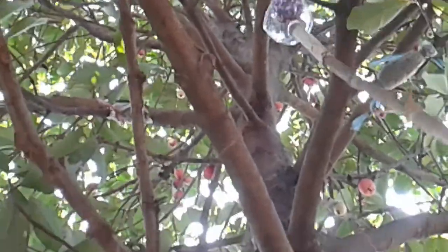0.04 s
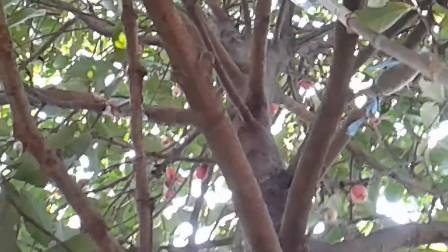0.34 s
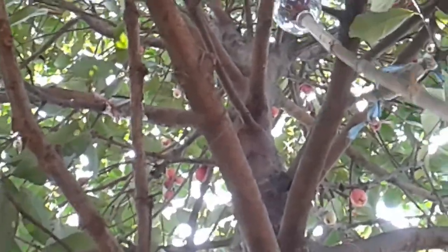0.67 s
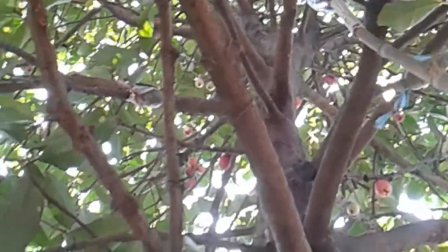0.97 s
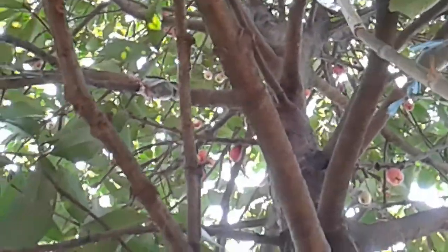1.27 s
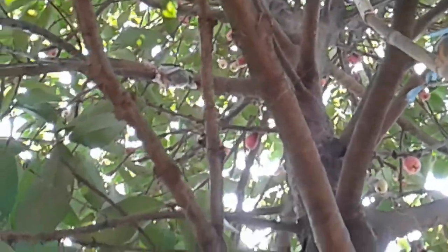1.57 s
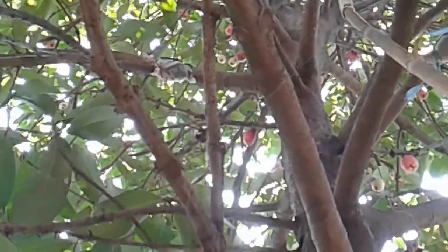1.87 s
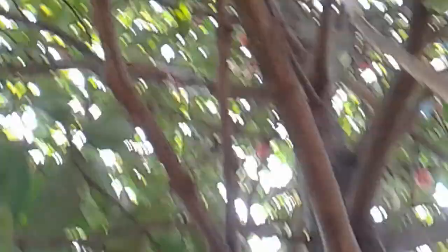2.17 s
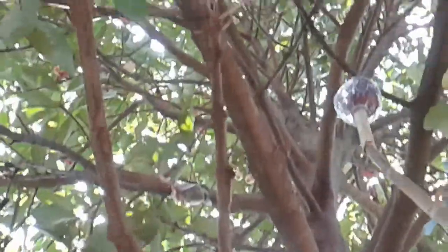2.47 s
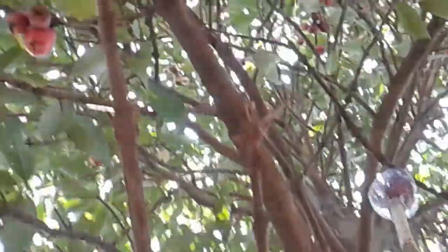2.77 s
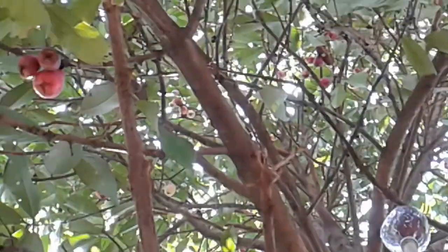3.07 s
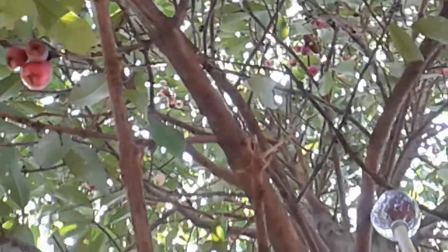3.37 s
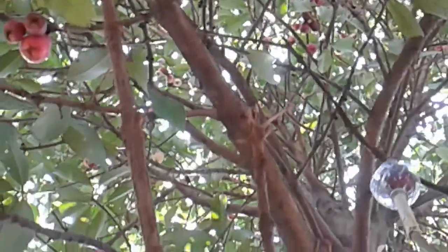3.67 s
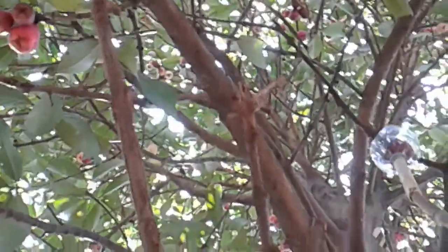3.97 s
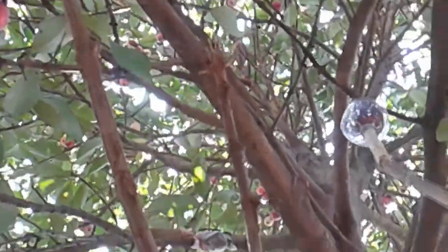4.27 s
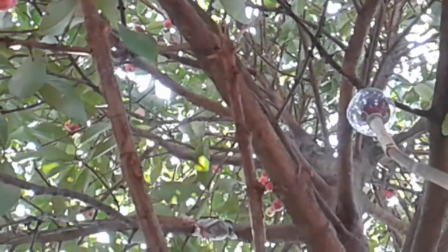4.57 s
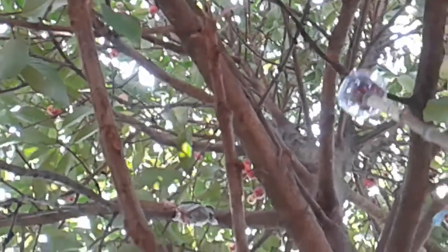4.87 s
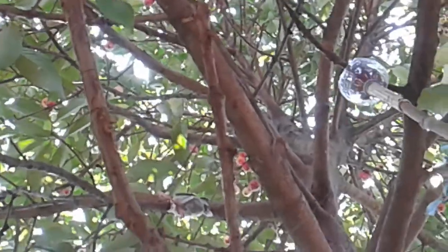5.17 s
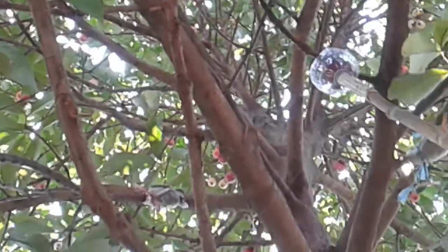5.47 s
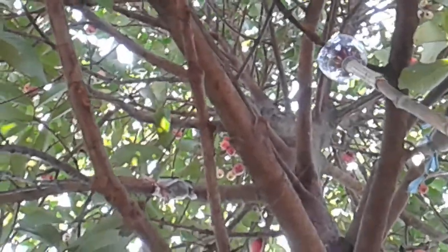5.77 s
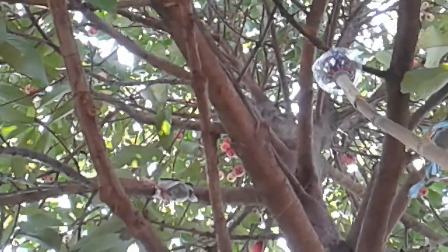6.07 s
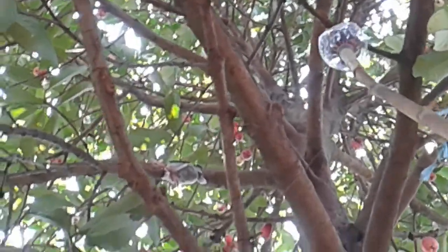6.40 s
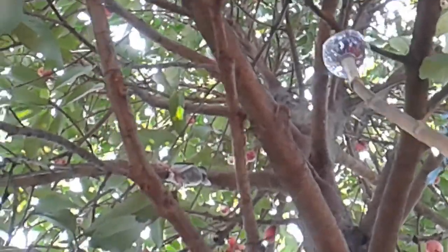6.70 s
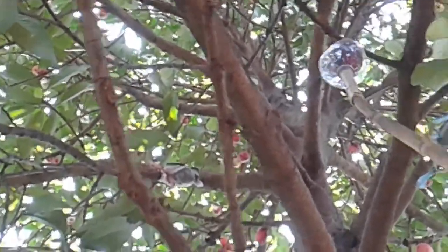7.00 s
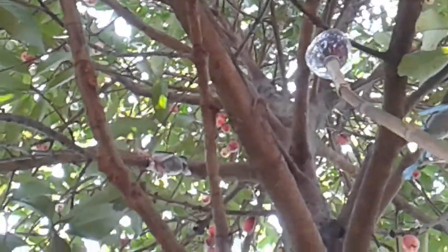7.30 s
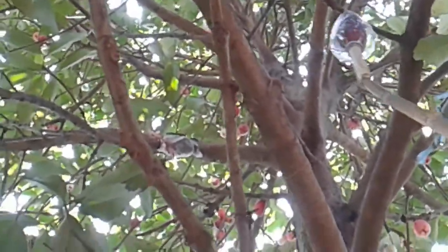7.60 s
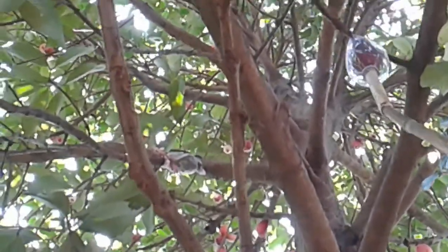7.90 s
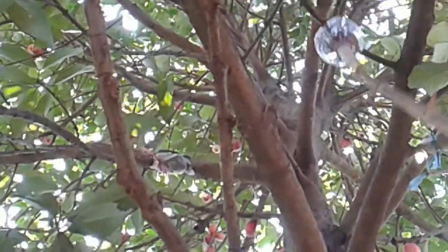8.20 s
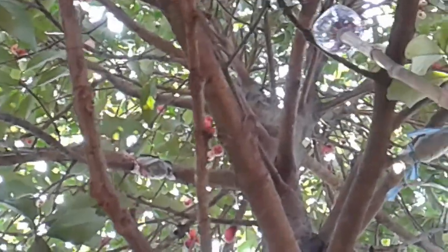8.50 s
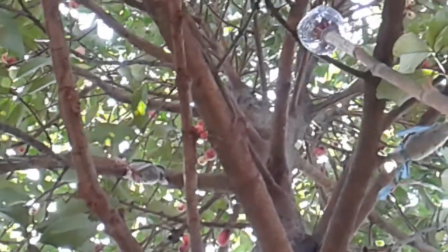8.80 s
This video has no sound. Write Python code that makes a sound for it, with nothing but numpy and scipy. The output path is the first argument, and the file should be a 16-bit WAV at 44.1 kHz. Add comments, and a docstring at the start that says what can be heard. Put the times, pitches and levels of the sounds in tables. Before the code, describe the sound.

A long pole tipped with a plastic bottle pokes through a tree outdoors. Twigs snap against the bottle in sharp, slightly hollow clicks, with brief scrapes and a faint leaf rustle. A few scattered snaps give way to a lull with tiny, far-off bird chirps. The clicks return as a distant engine passes, then crowd together and grow loudest near the end. Nearby walls add a short echo.

```python
"""Fruit picker in a tree

A long pole with a plastic bottle on its tip is pushed about in the crown of a tree. Twigs scrape
along the hollow bottle and snap free, leaves rustle, and nearby walls throw each click back.
The street noise swells and fades as an engine goes by, and small birds call far off.
A noise suppressor holds the rumble down between the clicks."""
import sys
import numpy as np
from scipy import signal
from scipy.fft import rfft, irfft
from scipy.io import wavfile
from scipy.ndimage import uniform_filter1d, minimum_filter1d

SR = 44100
rng = np.random.default_rng(int(sys.argv[2]) if len(sys.argv) > 2 else 0)


def unload_wav(signal):
    """Save mono or channel-first audio to the path in sys.argv[1] as 16-bit WAV at rate SR, clipped to [-1, 1]."""
    wavfile.write(
        sys.argv[1],
        SR,
        np.round(np.clip(np.atleast_2d(signal).T, -1, 1) * 32767).astype(np.int16),
    )


N = 390285
TIME = np.arange(N) / SR

# twigs snapping on the bottle: t/s, relative level/dB, knock/dB, midrange/dB, top edge/dB, echo/dB
SNAPS = [(0.004, -16, 8.5, -11, -12, 5), (0.46, -29, -1, 3, 3, -1.5), (0.554, -29, -10, -10, -1, 1),
         (0.661, -29.5, 5, 8.5, -28, 7), (1.1966, 2, -6.5, 0, -24, -1.5), (2.0019, -6, -3, -10, -3, 6.5),
         (2.1876, -3, -6, -4, -5, -11.5), (4.197, -28, 4, -3, 6, 2), (4.245, -27.5, 8, 2, -1, -3),
         (4.273, -27.5, 3, -2, 7, 2.5), (4.301, -29.5, 3, -3, -11, 4.5), (4.41, -30.5, 6, 4, 2, 2),
         (5.035, -3.5, 0, 4, -20, 3.5), (5.181, -1.5, 2, 4, -12, 2.5), (6.237, -11.5, 1, -12, -19, 1.5),
         (6.2856, -14.5, -3, -19, 3, 4.5), (6.8555, -12.5, 3, 3.5, -9, 1),
         (7.4475, -16, -4.5, -4, -6, -0.5), (7.5577, -3.5, -6.5, -14, -6, 0),
         (7.6127, -7.5, -.5, -3.5, -20, 1.5), (7.7445, -3, -6.5, -6, -11, 0.5),
         (7.775, -5, 0.5, -8, -4.5, -1), (8.2356, 6.5, -8, -4, -21, -2), (8.2673, -6, 9, -1, -9, 2.5),
         (8.303, -10, 2, -6, -20, 2), (8.349, -5, -10, -12, -20, -2), (8.4121, 0.5, -4, -6, -15, -6),
         (8.429, 3, 1.5, -9, -19, -0.5), (8.5449, -9.5, 9, -15, -20, -4),
         (8.6932, 14.5, -6.5, 2, -14, -2.5), (8.698, 9.5, -27, 3.5, -11, -5.5),
         (8.757, -8.5, 0, -7, -18, 3.5), (8.847, -8.5, -5, -14, -10, -10)]
# the bottle dragging along a twig: start/s, end/s, level/dB, hollow ring/dB
SCRAPES = [(0.002, 0.091, -52, 2), (0.232, 0.355, -52.5, 2.5), (0.516, 0.536, -51, 12),
           (0.581, 0.629, -55.5, 9), (1.362, 1.412, -56, 0), (1.59, 1.647, -59.5, 6),
           (2.137, 2.219, -42.5, 1.5), (4.976, 5.045, -44.5, 1), (6.239, 6.342, -46.5, 8),
           (7.905, 7.927, -47.5, 7), (8.182, 8.208, -46, -7), (8.215, 8.328, -39, 3), (8.32, 8.397, -51, 6),
           (8.415, 8.447, -34, 9), (8.473, 8.554, -52.5, 6.5), (8.651, 8.676, -47.5, 5),
           (8.761, 8.845, -49, 6)]
# tone of a cracking twig: f/Hz, level/dB
CRACK_TONE = [(40, -40), (150, -23), (500, -6), (800, -0.5), (1100, -9), (2800, -4.5), (4500, -2.5),
              (6500, -0.5), (8700, 4), (10000, 2.5), (11500, -3), (16000, -11.5)]
# where that tone is adjusted (bass, knock, midrange, both ends of the main band, top edge): f/Hz
TONE_BANDS = (300, 850, 1650, 3500, 8000, 13000)
# pitches at which the bottle rings: f/Hz, width/Hz, boost/dB (before scaling by hollowness)
BOTTLE_PEAKS = [(910, 207, 9.5), (1300, 150, 7.5), (1618, 93, 8.5), (1880, 250, 4.5), (2500, 520, 3),
                (3650, 220, 2), (4100, 170, 3), (5150, 300, 1.5), (6300, 240, 3.5), (8200, 340, 0.5)]
# echo of the walls: f/Hz, time to fade by 60 dB/s
WALL_FADE = [(150, 0.81), (900, 0.22), (2500, 0.25), (5000, 0.22), (8500, 0.2), (15000, 0.21)]
# the pole sweeping through leaves: middle/s, half length/s, level/dB
SWEEPS = [(.15, 0.19, -63.5), (1.12, 0.17, -64), (2.456, 0.054, -66.5), (4.247, 0.3, -64.5),
          (4.95, 0.08, -67), (6.452, 0.79, -60.5), (8.8, 0.45, -57.5)]
# tone of the leaves: f/Hz, level/dB
LEAF_TONE = [(60, -4), (300, -12), (900, 2), (1600, -1.5), (4000, 0.5), (6000, -6.5), (8600, 2.5),
             (11500, -11), (16000, -10)]
# tone of the street rumble: f/Hz, level/dB
STREET_TONE = [(30, -39), (48, -40), (65, -4), (110, 2), (300, 0), (500, -7), (900, -18), (1500, -27),
               (2200, -31.5), (5000, -31), (8600, -35.5), (11500, -40), (16000, -47)]
# loudness of the street rumble: t/s, level/dB
STREET_LEVEL = [(0, -50.5), (.5, -53), (3.7, -55.5), (4.3, -51.5), (5.3, -51.5), (6.2, -46.5), (7.3, -48.5),
                (7.8, -45), (8.85, -46.5)]
# tone of a broad swell of street noise: f/Hz, level/dB
SWELL_TONE = [(30, -35), (55, -18), (110, -4), (300, 1), (600, -4), (1000, -9.5), (1600, -18.5),
              (2400, -18.5), (5000, -22), (8300, -22.5), (12000, -38.5), (16000, -40)]
# peaks in that swell: f/Hz, width/Hz, boost/dB
SWELL_PEAKS = [(267, 26, 0), (1303, 190, 8.5), (1666, 230, 9), (3130, 440, 4.5)]
# tones of the passing engine: multiple of the firing rate, level/dB
ENGINE_TONES = [(3, 6.3), (8, 9), (9, 7.4)]
# tones of a later engine hum: multiple of the firing rate, level/dB
HUM_TONES = [(2, -20), (4, -0.5), (5, 2)]
# bird chirps: t/s, length/s, start f/Hz, end f/Hz, level/dB
CHIRPS = [(2.39, 0.06, 6000, 5000, -73), (2.431, 0.12, 5300, 4500, -73.5), (3.17, 0.057, 5060, 4200, -76),
          (7.931, 0.031, 6850, 5800, -67)]
# tone of still air: f/Hz, level/dB
AIR_TONE = [(30, 10), (80, 26.5), (250, 18.5), (600, 2), (2000, -17), (3800, -1), (6000, -12), (8600, -6.5),
            (11500, -9.5), (16000, -9)]


def snaps(break_s=0.0011, echo_db=-2, direct_db=-5, size=512):
    """Wood fibres give way in a burst of about a millisecond, which rings the bottle and echoes."""
    out, t = np.zeros(N), np.arange(size) / SR
    for start, db, knock_db, mid_db, edge_db, extra_echo_db in SNAPS:
        spectrum = rfft(rng.standard_normal(size) * np.sqrt(t) * np.exp(-t / break_s), 2 * size)
        flattened = unit_rms(abs(spectrum) ** .5)  # a break has no deep holes in its spectrum
        burst = irfft(flattened * np.exp(1j * np.angle(spectrum)))[:size]
        crack = amp(echo_db + extra_echo_db) * wall_echo()
        add(crack, 0, amp(direct_db) * burst)
        add(out, start, amp(db) * signal.fftconvolve(crack, bottle_ring(knock_db, mid_db, edge_db)))
    return out


def scrapes(slips_per_s=3000, spread_db=3, echo_db=-5, rise_share=0.19, release_s=0.012, build_db=1):
    """Many tiny slips of bark on plastic ring the bottle, harder as the twig bends."""
    out, t = np.zeros(N), TIME[:SR // 4]
    for start, end, db, hollow_db in SCRAPES:
        length = max(end - start, release_s)
        chance, strength, sign = rng.random((3, len(t)))
        sizes = amp(-spread_db * np.log(np.maximum(strength, .03)))
        slips = (chance < slips_per_s / SR) * np.sign(sign - .5) * sizes
        contact = np.clip(np.minimum(t / (rise_share * length), (length - t) / release_s), 0, 1)
        pressure = contact * amp(build_db * (np.minimum(t / length, 1) - .5))
        path = amp(echo_db) * wall_echo()
        path[0] += 1  # the sound that comes straight to the ear
        ring = bottle_ring(knock_db=hollow_db + 0.5, mid_db=hollow_db - 2.5, edge_db=-15.5)
        ring = signal.fftconvolve(ring, path)
        ring /= np.linalg.norm(ring)
        add(out, start, amp(db) * signal.fftconvolve(pressure * unit_rms(slips), ring))
    return out


def bottle_ring(knock_db, mid_db, edge_db, bass_db=-3, hollowness=1.126, size=4096):
    """How twig and bottle ring after one tap; every point of contact sounds a little different."""
    hz = np.fft.rfftfreq(size, 1 / SR)
    ripple_db = unit_rms(uniform_filter1d(rng.standard_normal(len(hz)), size=36))
    adjustments = list(zip(TONE_BANDS, (bass_db, knock_db, mid_db, 0, 0, edge_db)))
    detune = 1 + 0.01 * rng.uniform(-0.52, 1)
    db = look_up(CRACK_TONE, hz) + look_up(adjustments, hz) + ripple_db
    db += hollowness * humps(BOTTLE_PEAKS, hz * detune)
    log_gain = np.log(amp(np.r_[db, db[-2:0:-1]]))
    # turn the tone into a ring that starts at the tap, never before it
    return np.fft.ifft(np.exp(np.conj(signal.hilbert(log_gain)))).real


def wall_echo(size=20000, gap_s=0.0017, early_boost=1.3, early_s=0.0047, grain=0.36):
    """Sound bounces off limbs and walls, strongly at first; each pitch fades at its own speed."""
    t = np.arange(size) / SR
    bounces = rng.standard_normal(size) * np.exp(grain * rng.standard_normal(size))
    hz, frame_s, bands = signal.stft(bounces, SR, nperseg=256)
    fade = 1000 ** (-frame_s / look_up(WALL_FADE, hz)[:, None])
    tail = signal.istft(bands * fade, SR)[1][:size]
    tail *= (1 + early_boost * np.exp(-t / early_s)) * np.minimum(t / gap_s, 1) ** 2
    return tail / np.linalg.norm(tail)


def leaves(touches_per_s=260, spread_db=3, clump_db=3.5, clump_s=0.035, brush_s=0.0028, echo_s=0.028):
    """Leaf edges brush each other in clumps; each touch is a short puff of noise with a faint tail."""
    sizes = amp(spread_db * np.minimum(rng.exponential(1, N), 4) + clump_db * wander(clump_s))
    touches = (rng.random(N) < touches_per_s / SR) * sizes
    t = TIME[:SR // 4]
    fade = np.exp(-t / brush_s) / brush_s + 0.25 * np.exp(-t / echo_s) / echo_s
    power = abs(signal.oaconvolve(touches ** 2, fade)[:N])
    puffs = np.sqrt(power) * rng.standard_normal(N)
    tone = amp(look_up(LEAF_TONE, np.fft.rfftfreq(N, 1 / SR)))
    return stirring() * unit_rms(irfft(rfft(puffs) * tone, N))


def twig_ticks(ticks_per_s=55, spread_db=1.5, against_leaves_db=-2):
    """Thin twigs tick on the pole at random, louder when the leaves move more."""
    sizes = amp(spread_db * np.minimum(rng.exponential(1, N), 2.5)) * rng.choice([-1, 1], N)
    taps = sizes * (rng.random(N) < ticks_per_s / SR)
    path = wall_echo()
    path[0] += 1
    ring = signal.fftconvolve(path, bottle_ring(knock_db=10, mid_db=3, edge_db=-8))
    return amp(against_leaves_db) * stirring() * unit_rms(signal.oaconvolve(taps, ring)[:N])


def stirring(idle_db=-73.5):
    """How strongly the leaves move: a faint steady stir plus the sweeps of the pole."""
    return np.sqrt(amp(idle_db) ** 2 + sum(swell(*sweep) ** 2 for sweep in SWEEPS))


def traffic():
    """The street rumbles, its noise swells and fades as an engine goes by, and a later hum follows."""
    street = amp(np.interp(TIME, *np.transpose(STREET_LEVEL)))
    street *= drifting_noise(STREET_TONE, patchy_db=1.5, flicker_db=1.35)
    street_swell = swell(middle_s=6.385, half_s=0.55, db=-45.5)
    street_swell *= drifting_noise(SWELL_TONE, patchy_db=1.76, flicker_db=0.5, peaks=SWELL_PEAKS)
    passing = engine(ENGINE_TONES, firing_hz=32.6, middle_s=5.98, half_s=0.26, db=-46, sag_hz_per_s=1.8)
    later_hum = engine(HUM_TONES, firing_hz=33.6, middle_s=8.12, half_s=0.33, db=-51)
    return street + street_swell + passing + later_hum


def engine(tones, firing_hz, middle_s, half_s, db, sag_hz_per_s=0, waver=0.0091):
    """A distant engine fires unevenly and hums; with a sag, its pitch sinks as it goes by."""
    hz = firing_hz - sag_hz_per_s * (TIME - middle_s)
    firings = np.cumsum(hz * (1 + waver * wander(seconds=0.05))) / SR
    hum = sum(amp(tone_db) * np.sin(2 * np.pi * (k * firings + rng.random())) for k, tone_db in tones)
    return swell(middle_s, half_s, db) * unit_rms(hum)


def birds(echo_db=-1, rasp=0.05, rasp_s=0.001):
    """Small birds give thin, raspy, falling chirps, blurred by the walls."""
    out = np.zeros(N)
    for start, length, start_hz, end_hz, db in CHIRPS:
        hz = np.linspace(start_hz, end_hz, int(length * SR))
        hz *= 1 + rasp * wander(rasp_s)[:len(hz)]
        chirp = np.sin(2 * np.pi * np.cumsum(hz) / SR) * np.hanning(len(hz))
        add(out, start, amp(db) * unit_rms(chirp))
    return out + amp(echo_db) * signal.oaconvolve(out, wall_echo())[:N]


def still_air(db=-64.5):
    """A faint low rush and hiss behind everything."""
    return amp(db) * drifting_noise(AIR_TONE, patchy_db=2.3, flicker_db=1.8)


def drifting_noise(tone, patchy_db, flicker_db, peaks=(), size=2048):
    """Noise of a given tone; patches of it drift in level while the whole flickers."""
    hz, frames = np.fft.rfftfreq(size, 1 / SR), 4 * N // size + 5
    real, imaginary, patches = rng.standard_normal((3, frames, len(hz)))
    patches = unit_rms(uniform_filter1d(uniform_filter1d(patches, size=7, axis=0), size=9, axis=1))
    flicker = unit_rms(uniform_filter1d(rng.standard_normal(frames), size=5))[:, None]
    db = look_up(tone, hz) + humps(peaks, hz) + patchy_db * patches + flicker_db * flicker
    bands = (real + 1j * imaginary) * amp(db)
    return unit_rms(signal.istft(bands.T, nperseg=size, noverlap=size - size // 4)[1][:N])


def swell(middle_s, half_s, db):
    """Gain of a sound that comes and goes smoothly."""
    return amp(db) * np.exp(-.5 * ((TIME - middle_s) / half_s) ** 2)


def wander(seconds):
    """Random motion of typical size 1, smoothed over the given time."""
    return unit_rms(uniform_filter1d(rng.standard_normal(N), max(int(seconds * SR), 1)))


def amp(db):
    """Turns decibels into a gain."""
    return 10 ** (np.asarray(db) / 20)


def unit_rms(x):
    """Scales a signal to an average power of 1."""
    return x / np.sqrt(np.mean(x ** 2) + 1e-20)


def look_up(points, hz):
    """Reads between the rows of a frequency table, giving each octave equal room."""
    f, value = np.transpose(points)
    return np.interp(np.log(hz + 1), np.log(f), value)


def humps(peaks, hz):
    """A rounded boost in dB around each peak."""
    return sum(db / (1 + (2 * (hz - f) / width) ** 2) for f, width, db in peaks)


def add(mix, start_s, sound):
    """Mixes a sound in at the given time."""
    part = mix[max(round(start_s * SR), 0):][:len(sound)]
    part += sound[:len(part)]


def noise_suppressor(x, threshold_db=-61, range_db=8, hold_s=0.0049, bass_hz=700, treble_hz=2000):
    """Turns everything down, the bass most, and eases off when the treble gets loud."""
    treble = signal.sosfilt(signal.butter(2, treble_hz, "high", fs=SR, output="sos"), x)
    treble_db = 10 * np.log10(abs(uniform_filter1d(treble ** 2, int(0.0018 * SR))) + 1e-14)
    squeeze = 1.5 - np.clip((treble_db - threshold_db) / range_db, 0, 1)  # 1.5 when quiet, 0.5 when loud
    squeeze = uniform_filter1d(minimum_filter1d(squeeze, int(hold_s * SR)), size=256)
    bass_cut_db, overall_cut_db = 7 * squeeze, 3 * squeeze
    bass = signal.sosfiltfilt(signal.butter(2, bass_hz, fs=SR, output="sos"), x)
    return (x - bass * (1 - amp(-bass_cut_db))) * amp(-overall_cut_db)


def scene():
    """The pole in the tree over the sounds of the neighbourhood, in one channel."""
    return (still_air() + traffic() + leaves() + twig_ticks() + birds() + snaps() + scrapes())[None]


def record(dry, low_cut_hz=52, high_cut_hz=16100):
    """The microphone drops the deepest bass; then noise is suppressed and the highest treble is cut."""
    x = signal.sosfilt(signal.butter(2, low_cut_hz, "high", fs=SR, output="sos"), dry[0])
    low_pass = signal.firwin(401, high_cut_hz, window=("kaiser", 8), fs=SR)
    return signal.oaconvolve(noise_suppressor(x), low_pass, "same")[None]


dry = scene()
out = record(dry)
unload_wav(out)
```